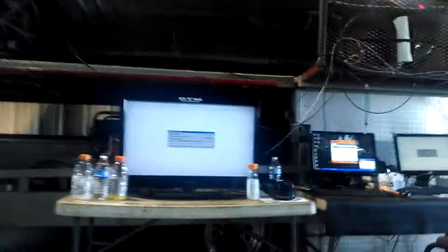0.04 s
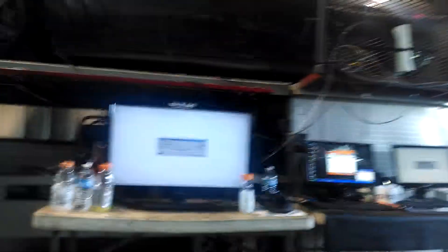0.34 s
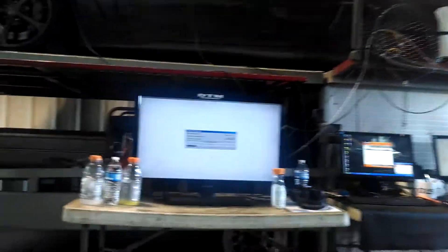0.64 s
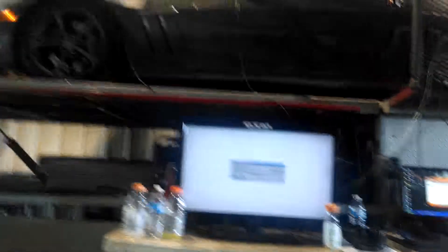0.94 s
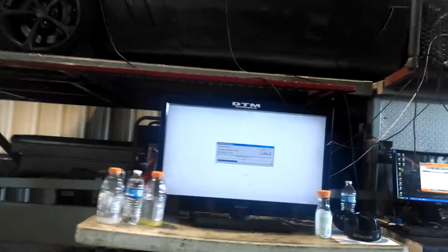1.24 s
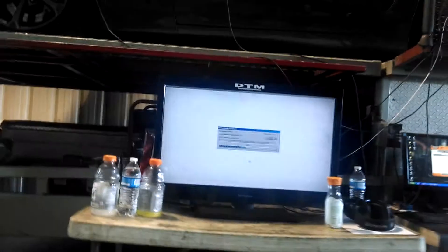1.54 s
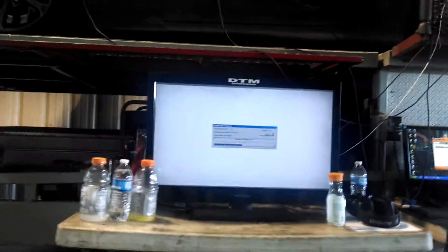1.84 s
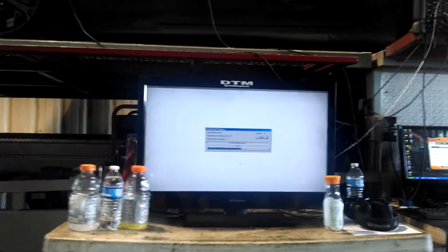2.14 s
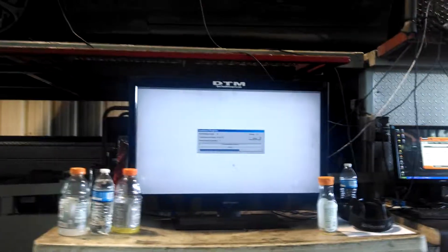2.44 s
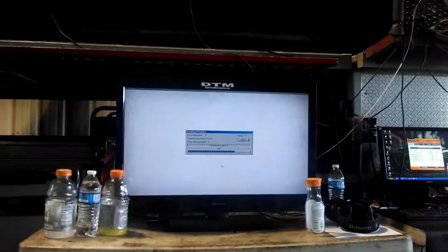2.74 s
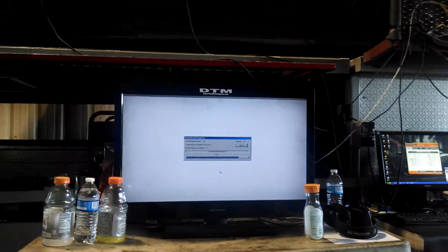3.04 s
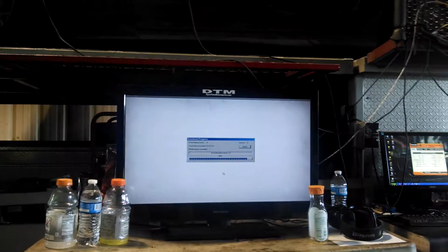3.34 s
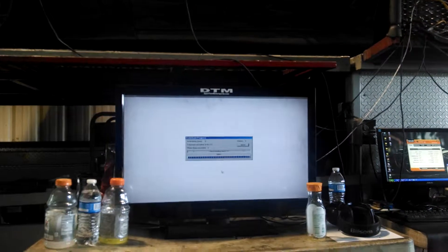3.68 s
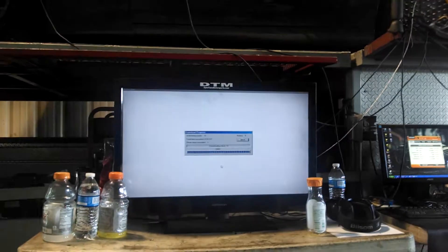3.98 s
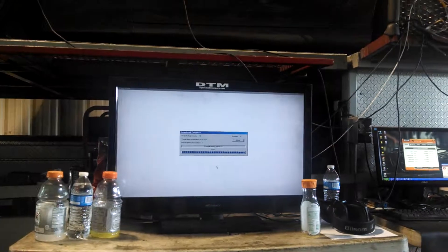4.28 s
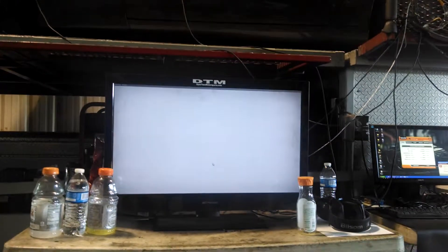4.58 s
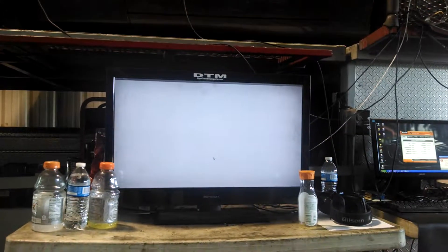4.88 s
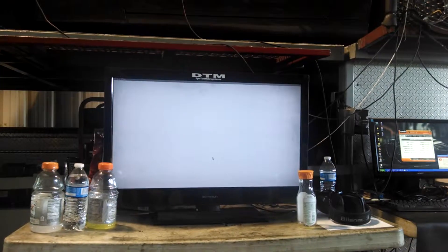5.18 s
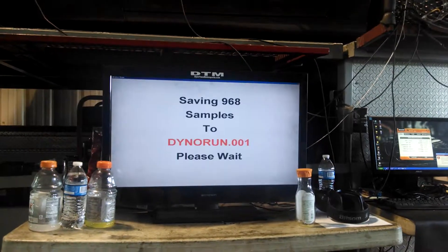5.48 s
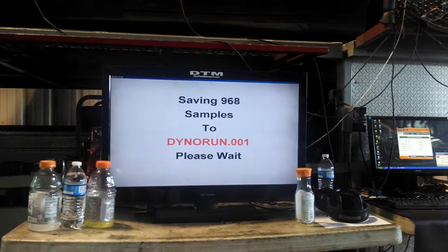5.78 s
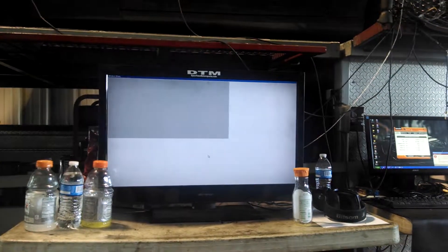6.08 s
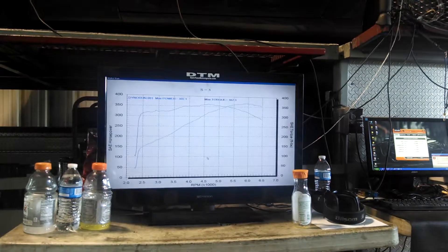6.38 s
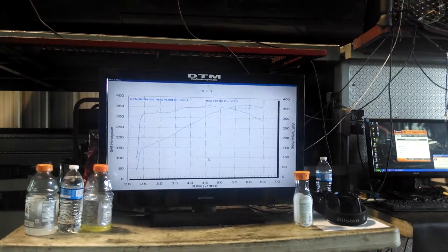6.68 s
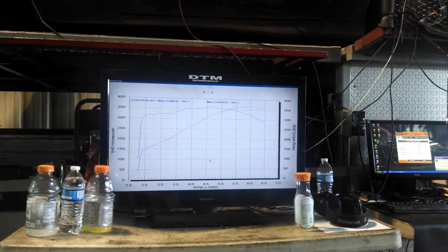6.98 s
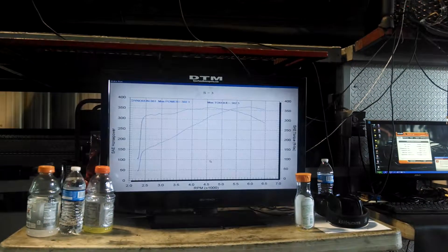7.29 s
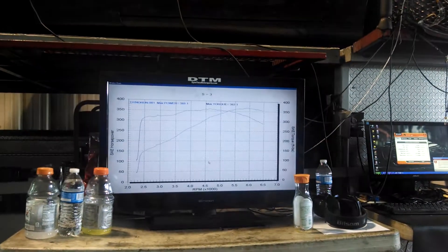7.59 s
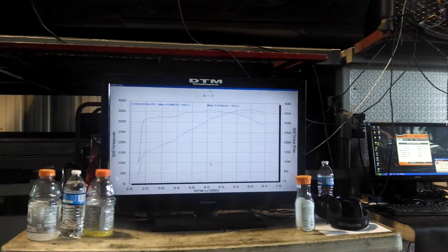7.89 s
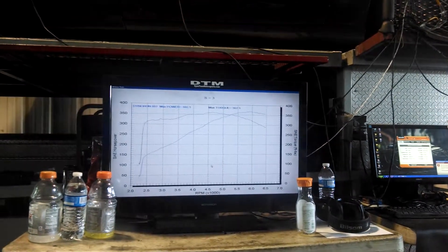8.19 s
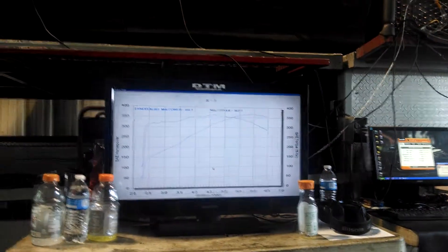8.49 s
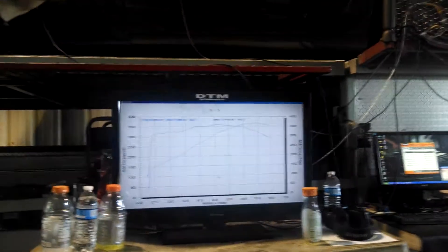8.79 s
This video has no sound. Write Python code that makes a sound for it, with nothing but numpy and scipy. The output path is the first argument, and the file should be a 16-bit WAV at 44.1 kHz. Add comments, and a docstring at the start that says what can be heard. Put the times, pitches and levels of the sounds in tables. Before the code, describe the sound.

In a workshop, a loud V8 starts at high revs and slowly winds down on dynamometer rollers, with a steady rush of air and a tyre drone around it. As the pitch sinks, the exhaust turns into a ragged, throbbing burble and a thin, fuzzy whine from the rollers becomes clearer. Soft rumbles and humming panels pass underneath. The stereo sound has a short echo, and the engine is still running at the end.

```python
"""A workshop, on a two-port stereo microphone: a loud V8 coasts down in gear on a chassis dynamometer.
Its exhaust orders slide through the fixed resonances of pipes and room, and it burbles more as it slows.
The tyres drone and rush on the drums, whose knurling whines a thousand times a turn.
Low rumbles come and go, and loose panels hum as the falling speed shakes each in turn."""
import sys
import numpy as np
from scipy import signal
from scipy.fft import rfft, irfft
from scipy.io import wavfile
from scipy.ndimage import uniform_filter1d

SR = 44100
rng = np.random.default_rng(int(sys.argv[2]) if len(sys.argv) > 2 else 0)


def generate_wav(sig):
    """Save sig (samples, or channels by samples) to the path in sys.argv[1] as 16-bit PCM at SR."""
    pcm = np.round(np.clip(np.atleast_2d(sig).T, -1, 1) * 32767).astype(np.int16)
    wavfile.write(sys.argv[1], SR, pcm)


N = 398223
T = np.arange(N) / SR
HZ = np.fft.rfftfreq(N, 1 / SR)
WHEEL_RATIO, DRUM_RATIO = 0.6333, 0.344  # turns per engine cycle
# phase by which the left channel leads the right: frequency_hz, lead_rad
LEFT_LEAD = [(20, -1.5), (200, -0.82), (340, -0.26), (530, -1), (640, -1.5), (880, 0.25), (1700, -0.47),
             (2100, -2.5), (3000, -3.5), (3650, -7), (4400, -5), (4900, -10.5), (5700, -8), (6400, -13.5),
             (7200, -13.5), (15000, -28)]


def amp(db):
    """Decibels to gain."""
    return 10 ** (np.asarray(db) / 20)


def unit_rms(x):
    """Scale to rms 1."""
    return x / np.sqrt(np.mean(np.abs(x) ** 2) + 1e-20)


def curve(rows, t=T):
    """A time table joined by straight lines."""
    return np.interp(t, *np.transpose(rows))


def lookup(rows, hz, column=1):
    """One column of a table on a log-frequency axis."""
    rows = np.array(rows, float)
    return np.interp(np.log(hz + 1e-6), np.log(rows[:, 0]), rows[:, column])


def wander(hz):
    """Smooth random drift of rms 1, changing at up to about hz."""
    return unit_rms(irfft(rfft(rng.standard_normal(N)) * np.exp(-0.5 * (HZ / hz) ** 2), N))


def peak(hz, width_hz):
    """A resonance curve of height 1."""
    return 1 / (1 + (2 * (HZ - hz) / width_hz) ** 2)


def swell(peak_s, length_s):
    """A bell-shaped rise and fall of height 1."""
    return np.exp(-(2 * (T - peak_s) / length_s) ** 2)


def causal(gain):
    """The spectrum of a filter with this gain that rings only after it is struck."""
    log_gain = np.log(gain + 1e-6)
    cepstrum = irfft(log_gain, N)
    return np.exp(log_gain + 2j * rfft(cepstrum[:, :N // 2], N).imag)


def microphone(common, other, hz=HZ):
    """Two unrelated spectra become room-filling sound at the left and right ports."""
    # how alike the ports sound: frequency_hz, coherence
    likeness = [(50, 0.97), (200, 0.97), (700, 0.56), (1150, 0.95), (1600, 0.76), (1900, 0.05), (2350, 1),
                (2750, 1.), (3400, 0.055), (4000, 0.9), (4600, 0.57), (5400, 0.75), (6100, 0.24),
                (6700, 0.56), (14000, 0.17)]
    # stereo balance: frequency_hz, left_minus_right_db
    balance = [(60, 5), (180, 3), (400, -3.5), (750, -2.5), (1500, 0.5), (2700, 1.5), (5000, -1.5),
               (7000, -2.5), (9500, -9), (15000, -8.5)]
    same = np.clip(lookup(likeness, hz), 0, 1)
    left = (same * common + np.sqrt(1 - same ** 2) * other) * np.exp(1j * lookup(LEFT_LEAD, hz))
    tilt = amp(lookup(balance, hz))
    return np.array([left * tilt, common]) * np.sqrt(2 / (1 + tilt ** 2))


def workshop(x, t60_s):
    """A dense tail of reflections reaches each port."""
    tails = rng.standard_normal((2, SR)) * amp(-60 * T[:SR] / t60_s)
    tails /= np.linalg.norm(tails, axis=1, keepdims=True)
    return irfft(microphone(*(rfft(tails, N) * rfft(x))), N)


def pipes_and_room(x, valley_db=-20):
    """Resonances and dead spots differ at the two ports and turn the phase of a passing order."""
    # modes of pipes and room: pitch_hz, width_hz, level_db, left_minus_right_db
    resonances = [(179, 21.2, -1.5, 3), (219.8, 28.6, 0, 0.5), (266.5, 24.3, -3.0, -1.5),
                  (289, 7.1, -4, -5), (321.8, 36.5, -2.5, -3), (374, 28.4, -2.5, -6.5),
                  (409.8, 22.6, 4, -1), (425, 22, 0.5, -12.5), (460.2, 28, 1.5, -2), (481.2, 34.4, -1, -8),
                  (518, 17, -1.5, 7), (535.4, 25, 8, -3.5), (585.4, 57, 2.5, -7), (613, 19.5, 4, -7.5),
                  (642.6, 14.3, 0, -7), (718, 46, -2, -4.5), (763, 49, -5.5, -12), (842, 160, -11, -17),
                  (1005, 124, -1.5, -0.5), (1214, 107, -1.5, -2)]
    # where reflections cancel: pitch_hz, width_hz, left_db, right_db
    dead_spots = [(190.3, 3, -6, -8), (234, 22, -9.5, -13), (280.7, 5.8, -1.5, -9), (305, 15, -4.5, -6.5),
                  (354, 13, -17, -5), (449.6, 6, -22, -21), (501, 10, -5, 1), (555.6, 11, -10.5, -8),
                  (668, 14, -6, -3)]
    power = np.full((2, len(HZ)), amp(valley_db) ** 2)
    for hz, width, db, side_db in resonances:
        share = amp([[side_db], [0]]) ** 2
        power += 2 * share / share.sum() * amp(db) ** 2 * peak(hz, width) ** 2
    dips_db = np.zeros_like(power)
    for hz, width, left_db, right_db in dead_spots:
        dips_db += np.outer([left_db, right_db], peak(hz, width) ** 2)
    spectrum = rfft(x) * causal(np.sqrt(power) * amp(dips_db))
    lead = np.outer([1, 0], lookup(LEFT_LEAD, HZ))
    return irfft(spectrum * np.exp(1j * lead), N)


def exhaust(speed, cycles, gain_db=-0.9, jitter_cycles=0.00025, unsteady=0.07,
            throb_order=13, scatter=0.11, smear=0.042, fading=2.1, crowded_hz=680, crowded_db=-3.5):
    """Harmonics (orders) of the engine cycle; no two cycles are quite equal in strength or timing."""
    # exhaust harmonics: order, high_revs_db, middle_revs_db, low_revs_db
    orders = [(2, -37, -24, -36), (4, -24, -47.5, -20.5), (5, -34, -42, -31.0), (6, -20.5, -19, -23),
              (7, -31.5, -36.5, -57), (8, -14, -19.5, -17.5), (9, -34, -27.5, -36.5), (10, -31, -33, -32),
              (11, -17.5, -25, -45), (12, -18, -30, -34), (13, -20, -33.5, -42), (14, -14.5, -18, -29),
              (15, -43.5, -17.5, -30.5), (16, -18, -27, -20.5), (17, -19.5, -41.5, -21),
              (18, -14, -36.5, -31.5), (19, -14.5, -30, -28), (20, -24, -33, -30), (21, -24, -39, -30.5),
              (22, -26, -23.5, -32.5), (23, -22, -34.5, -34), (24, -22.5, -30.5, -36), (25, -37, -40, -45),
              (26, -22, -35, -35), (28, -24, -36, -39), (30, -20.5, -29, -39), (34, -12, -32, -38)]
    # single orders bloom or sink as they slide: peak_s, length_s, order, gain_db
    blooms = [(0.28, 0.89, 11, -13), (0.3, 0.39, 10, 5), (0.9, 0.3, 7, 9), (1.15, 0.39, 11, 5),
              (1.4, 1.0, 18, 4.5), (1.65, 0.73, 12, -1), (1.808, 0.78, 10, 11), (1.9, 0.6, 24, 7),
              (2.1, 0.44, 17, 3), (2.396, 0.17, 13, 1), (2.6, 0.89, 15, 5), (2.65, 0.6, 28, 4),
              (2.85, 1.8, 14, -14.5), (2.9, 0.4, 17, 10), (3.355, 0.38, 16, 7), (3.45, 0.37, 15, -9),
              (3.7, 0.35, 20, 14), (3.85, 1.2, 13, 4.5), (3.85, 0.55, 16, -10), (3.973, 0.34, 17, 17),
              (4.7, 0.36, 15, -8), (4.758, 0.72, 14, 4.5), (4.94, 0.58, 16, 5), (5.2, 0.5, 26, 17),
              (5.45, 0.68, 7, 11), (5.5, 0.6, 12, 1), (5.9, 0.44, 14, 1.5), (6.0, 0.5, 21, 8),
              (6.1, 0.77, 18, 9), (6.5, 0.5, 15, 1), (6.5, 0.7, 14, -4), (6.51, 0.47, 20, -8),
              (7.2, 1.1, 19, 2), (7.306, 0.55, 21, 13), (7.603, 0.29, 22, 5), (7.702, 0.44, 17, 6),
              (7.75, 0.35, 16, 3.5), (8.0, 0.73, 18, 4), (8.046, 1, 23, 12.5), (8.42, 0.73, 24, 12.5)]
    # how hard the exhaust blows: time_s, gain_db
    effort = [(0.0, -2), (0.3, 0.6), (0.8, 1.4), (1.6, -0.5), (2.1, -2), (2.4, 1.5), (3.3, 0), (4.3, -1.5),
              (4.8, -0.5), (5.6, -0.5), (6.5, 0), (7.6, 0.5), (8.1, -2.5), (9.0, 1.5)]
    revs = (speed - speed.min()) / np.ptp(speed)
    angle = 2 * np.pi * (cycles + jitter_cycles * wander(hz=28))
    knots_s = np.linspace(0, T[-1], 110)
    blasts = np.zeros(N)
    for order, high_db, middle_db, low_db in orders:
        db = np.interp(revs, [0, 0.5, 1], [low_db, middle_db, high_db])
        for peak_s, length_s, bloom_order, bloom_db in blooms:
            if bloom_order == order:
                db += bloom_db * swell(peak_s, length_s)
        # upper orders slide over crowded room modes, which scatter their strength and timing
        crowded = np.clip((order * speed - crowded_hz) / 300, 0.03, 1)
        chance = np.interp(T, knots_s, rng.standard_normal((len(knots_s), 2)) @ [1, 1j])
        fade = (1 + fading * crowded * unit_rms(chance)) / np.sqrt(1 + (fading * crowded) ** 2)
        # the pipes smear each blast; the middle orders stay in step, so a rounded throb survives
        looseness = min(scatter * abs(order - throb_order), 1)
        lag = np.pi * smear * order ** 2 + 2 * np.pi * looseness * (rng.random() - 0.5)
        tone = (fade * np.exp(1j * (order * angle - lag))).real
        blasts += np.sqrt(2) * amp(db + crowded_db * crowded) * tone
    return pipes_and_room(blasts) * amp(curve(effort) + gain_db) * (1 + unsteady * wander(hz=4))


def burble(cycles, throb=0.77, firing_depth=0.85, clump_db=1.0, low_hz=330, top_hz=700,
           stereo_spread=0.64, rasp_db=-12):
    """Ragged puffs of gas ring pipes and room with a little rasp; they clump and swell once a cycle."""
    # the firing turns ragged in surges as the engine slows: time_s, level_db
    surges = [(0, -32), (4.9, -31), (5.3, -21), (5.6, -23.5), (6.45, -23), (7.05, -28.5), (7.55, -20),
              (7.85, -22.5), (7.98, -25), (8.5, -25.5), (8.85, -24)]
    gas = rng.standard_normal(N) + stereo_spread * rng.standard_normal((2, N))
    puffs = gas * (1 + firing_depth * np.cos(2 * np.pi * 8 * cycles))
    band = 1 / np.sqrt((1 + (HZ / top_hz) ** 6) * (1 + (low_hz / (HZ + 1)) ** 4))
    body = unit_rms(pipes_and_room(irfft(rfft(puffs) * band, N)))
    rasp = unit_rms(irfft(rfft(puffs[0]) * peak(hz=1330, width_hz=260), N))
    lumps = unit_rms((1 + throb * np.cos(2 * np.pi * cycles)) * amp(clump_db * wander(hz=25)))
    return (body + amp(rasp_db) * rasp) * lumps * amp(curve(surges))


def rolling(turns, harmonics, size=8192):
    """An uneven surface that repeats with every turn."""
    per_turn = np.arange(size // 2 + 1)
    heights = amp(lookup(harmonics, per_turn)) * (per_turn > 0) * (per_turn <= harmonics[-1][0])
    phases = np.exp(2j * np.pi * rng.random(len(per_turn)))
    surface = irfft(heights * phases) * size / np.sqrt(2)
    return np.interp(turns % 1 * size, np.arange(size), surface)


def wheels(cycles, slip_turns=0.00085):
    """Two wheels, each on its drum, drone through the frame; the rubber creeps a little."""
    # spectrum of the tread pattern: bumps_per_turn, level_db
    tread = [(20, -55.5), (28, -57), (31, -38), (33, -49), (36, -42), (42, -46), (60, -41), (73, -41.5),
             (80, -37), (88, -36.5), (94, -46), (103, -44), (112, -58), (130, -61), (142, -51), (146, -43),
             (150, -50), (166, -62), (186, -52), (208, -68), (258, -68), (272, -55), (290, -70)]
    # spectrum of the out-of-round drum: bumps_per_turn, level_db
    drum_shape = [(1, -60), (2, -62), (4, -36.5), (7, -57), (9, -37), (11, -50.5), (12, -39), (13, -39),
                  (14, -54.5), (22, -56), (30, -56)]
    # how the steel frame and tyre walls radiate: frequency_hz, gain_db
    frame = [(30, -36), (62, -8.5), (88, -10.5), (120, -11.5), (155, 3.5), (210, 2.5), (270, 6.5),
             (680, 1.5), (860, 5), (1000, -5.5), (1250, -3), (1580, 0), (1900, -18), (2600, -10),
             (4000, 3.5)]
    spectra = []
    for _ in range(2):
        tyre = rolling(WHEEL_RATIO * cycles + slip_turns * wander(hz=5.1), tread)
        drum = rolling(DRUM_RATIO * cycles, drum_shape)
        spectra.append(rfft(tyre + drum) * amp(lookup(frame, HZ)))
    return irfft(microphone(*spectra), N)


def air_rush(patchy_db=1.0, flicker_db=0.5, size=512):
    """Air torn by tread and fans, flickering in patches; its treble fades as the run goes on."""
    # treble of the rush: time_s, level_db
    treble = [(0.08, -23), (1.31, -24.5), (1.75, -21.5), (2.14, -25.5), (2.24, -23), (5.52, -26),
              (5.55, -28.5), (6.1, -28), (7.18, -31.5), (7.52, -28), (8.01, -31), (8.9, -28.5)]
    # spectrum of the rush: frequency_hz, density_db, share_of_treble_change
    colour = [(20, -89, 0), (55, -81, 0.025), (111, -53.5, 0.032), (202, -62, 0.3), (686, -56, 0.5),
              (1410, -56, 0.28), (2240, -56, 1), (3500, -60.5, 0.81), (6100, -61, 0.99),
              (7660, -63.5, 0.53), (9350, -63, 0.22), (12000, -69.5, 0.58), (15200, -78.5, 0.69)]
    hop = size // 4
    t = np.arange(N // hop + 5) * hop / SR
    hz = np.fft.rfftfreq(size, 1 / SR)
    real, imag, other_real, other_imag, patches = rng.standard_normal((5, len(t), len(hz)))
    air = microphone(real + 1j * imag, other_real + 1j * other_imag, hz)
    patches = unit_rms(uniform_filter1d(uniform_filter1d(patches, size=8, axis=0), size=10, axis=1))
    flicker = unit_rms(uniform_filter1d(rng.standard_normal(len(t)), size=6))
    treble_db = curve(treble, t)
    db = lookup(colour, hz) + np.outer(treble_db - treble_db.mean(), lookup(colour, hz, column=2))
    air *= amp(db + patchy_db * patches + flicker_db * flicker[:, None])
    _, rush = signal.istft(air.transpose(0, 2, 1), nperseg=size, noverlap=size - hop)
    return np.sqrt(3 * SR / (2 * size)) * rush[:, :N]


def knurl_whine(drum_turns, knurls=1000, width_hz=55, skirt_hz=170, skirt_gain=0.99, octave_db=-13):
    """Knurls strike the rubber in a fuzzy tone; alternate rows differ and add the octave below."""
    # the whine grows as the drums slow: time_s, level_db
    growth = [(1, -38), (3.8, -34), (5, -31.5), (6.2, -26.5), (7, -32), (8, -27), (8.55, -27.5), (8.9, -26)]
    angle = 2 * np.pi * knurls * drum_turns
    fuzz = wander(width_hz) + skirt_gain * wander(skirt_hz)
    tone = fuzz * (np.cos(angle) + amp(octave_db) * np.cos(angle / 2))
    return workshop(unit_rms(tone) * amp(curve(growth)), t60_s=0.33)


def rumbles():
    """Narrow bands of low rumble rise in the room and sink again."""
    # swells of rumble: peak_s, length_s, pitch_hz, width_hz, level_db
    swells = [(2.398, 1.3, 77, 40, -39), (3.7, 1.1, 133, 70, -35), (7.25, 0.62, 48.5, 40, -38)]
    rumble = np.zeros(N)
    for peak_s, length_s, hz, width, db in swells:
        band = irfft(rfft(rng.standard_normal(N)) * peak(hz, width) ** 2, N)
        rumble += unit_rms(band) * amp(db) * swell(peak_s, length_s)
    return workshop(rumble, t60_s=0.28)


def panels(speed):
    """Each panel mode hums in a narrow, restless band while the speed passes the one that shakes it."""
    # loose panels: pitch_hz, width_hz, level_db, engine_cycle_hz, cycle_spread_hz
    modes = [(747.5, 22, -32.5, 28.6, 8.9), (865, 53, -31, 36, 2.3), (879, 27, -31.5, 27, 5),
             (1088, 52, -27, 20.7, 3.1), (1453, 28, -32.5, 29.7, 8.4)]
    hums = np.zeros((2, N))
    for hz, width, db, at_speed, spread in modes:
        hum = irfft(rfft(rng.standard_normal((2, N))) / (1 + 2j * (HZ - hz) / width) ** 2, N)
        hums += amp(db) * unit_rms(hum) * np.exp(-((speed - at_speed) / spread) ** 2)
    return irfft(microphone(*rfft(hums)), N)


def scene():
    """One falling speed drives engine, wheels and drums, all heard from one spot in the workshop."""
    # engine speed, a cycle being two crank turns and eight firings: time_s, engine_cycle_hz
    coast_down = [(0, 49.15), (0.6, 47.36), (1.3, 45.13), (2, 42.82), (3, 39.43), (4, 35.97), (5, 32.5),
                  (6, 29.1), (7, 25.84), (8, 22.72), (9.03, 19.42)]
    # drone of tyres and panels: time_s, gain_db
    drone_level = [(0, 1), (2.65, -1), (2.85, 6), (3.1, 2), (4.25, 1), (4.42, 2.5), (4.7, 1.5), (5.2, 1),
                   (5.45, 2.5), (5.7, -2), (6.2, 0.5), (7.05, -1), (7.8, 2.5), (7.95, -4), (8.4, -2)]
    speed = curve(coast_down)
    cycles = np.cumsum(speed) / SR
    engine = exhaust(speed, cycles) + burble(cycles)
    reflections = amp(-13.5) * workshop(engine[1], t60_s=0.48)
    drone = (wheels(cycles) + panels(speed)) * amp(curve(drone_level))
    return engine + reflections + drone + rumbles() + knurl_whine(DRUM_RATIO * cycles) + air_rush()


def record(dry, cutoff_hz=15400):
    """The recorder clips any peak over full scale, then cuts the highest treble."""
    clipped = np.clip(dry, -1, 1)
    low_pass = signal.firwin(511, cutoff_hz, window=("kaiser", 9), fs=SR)
    return signal.oaconvolve(clipped, low_pass[None], "same")


dry = scene()
out = record(dry)
generate_wav(out)
```